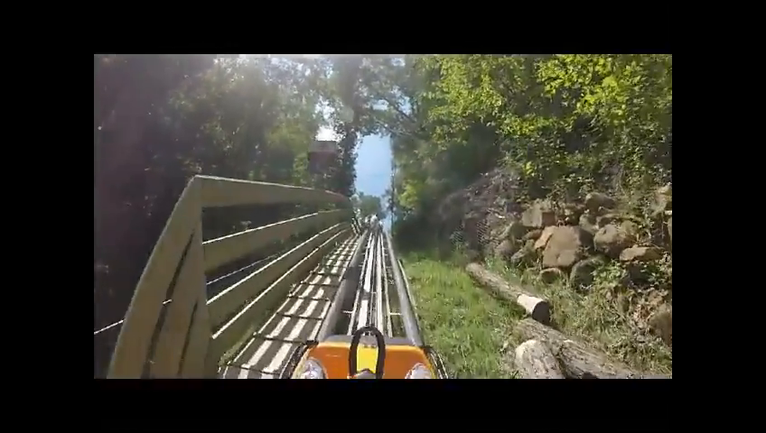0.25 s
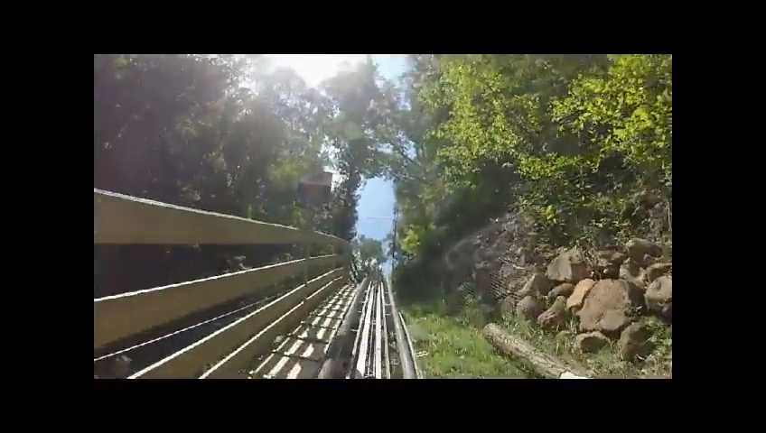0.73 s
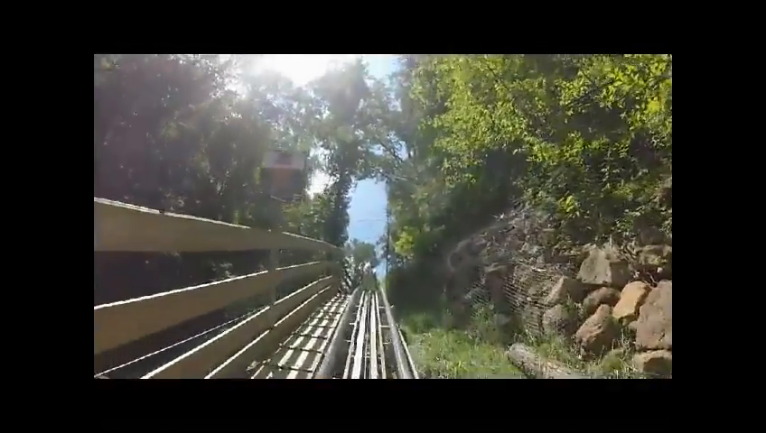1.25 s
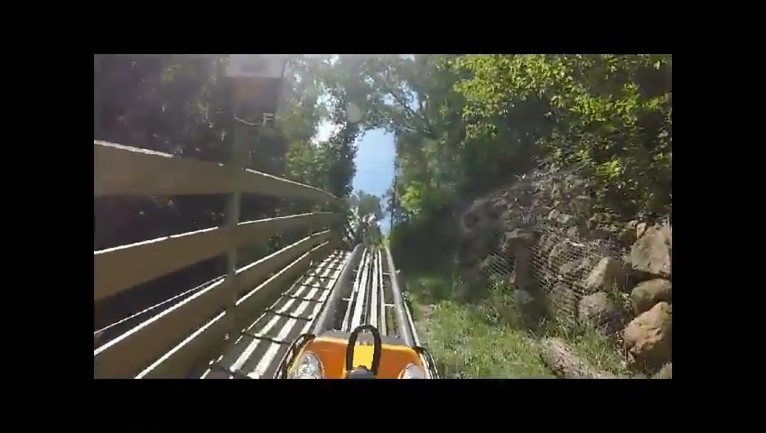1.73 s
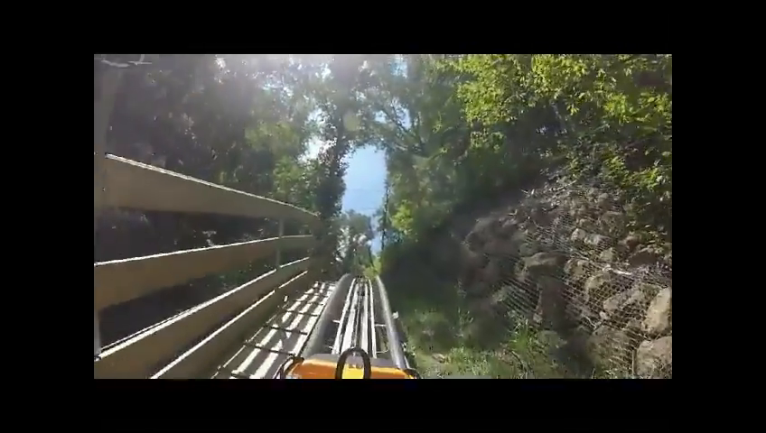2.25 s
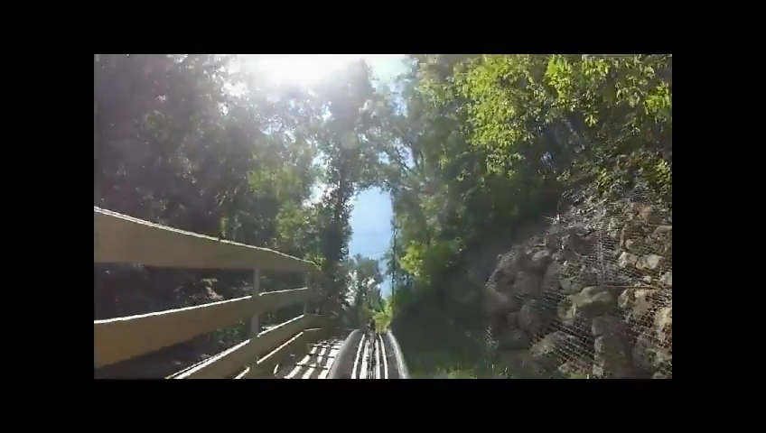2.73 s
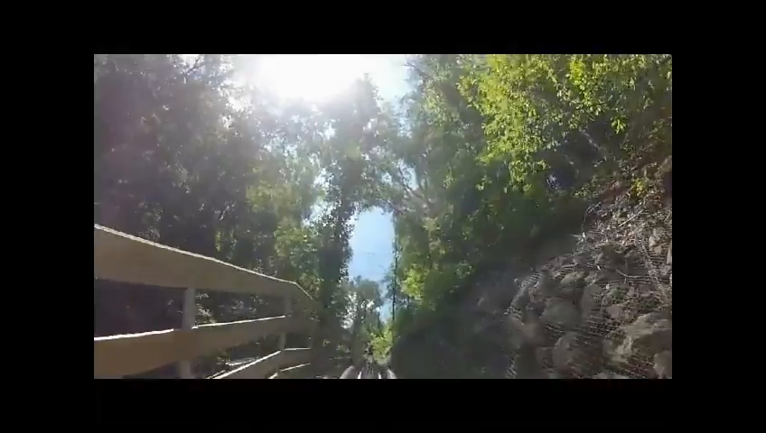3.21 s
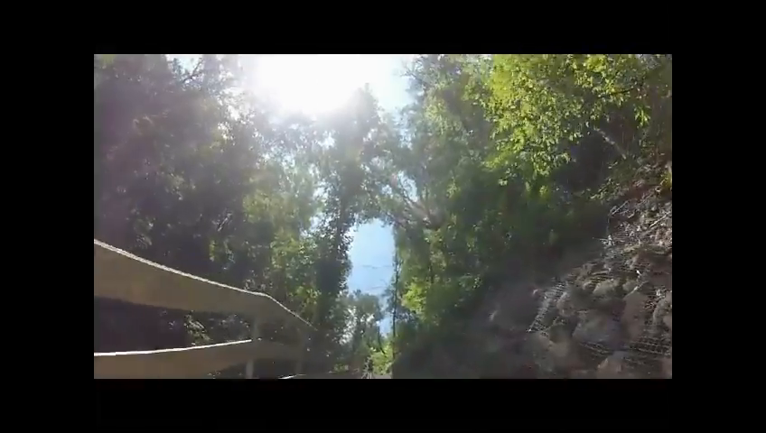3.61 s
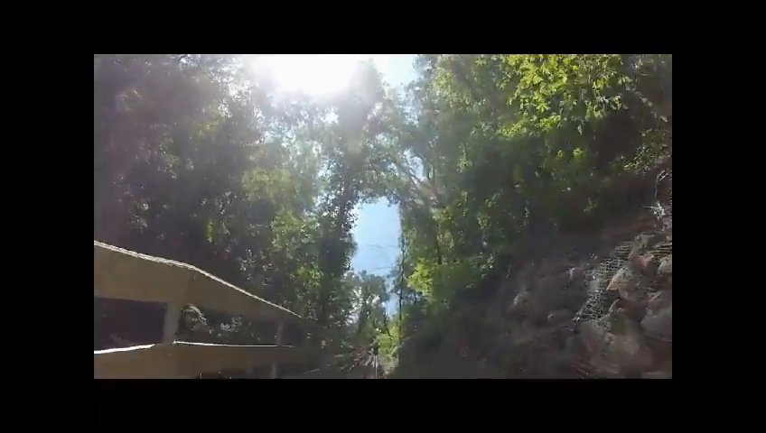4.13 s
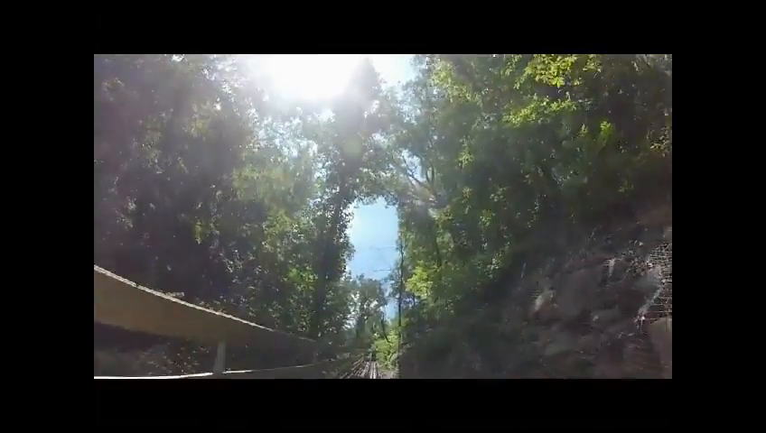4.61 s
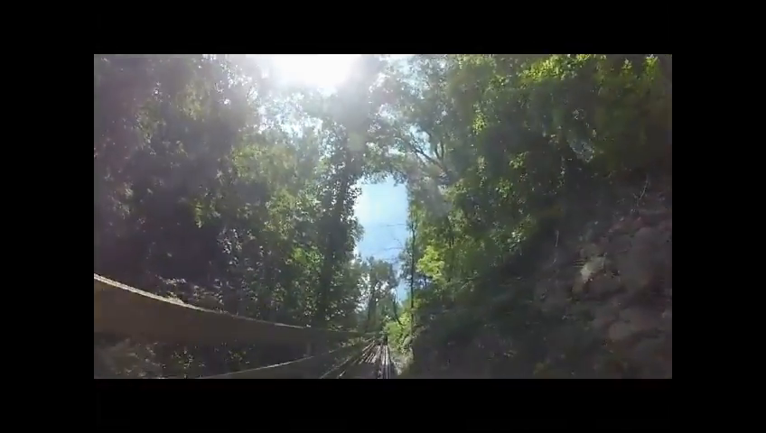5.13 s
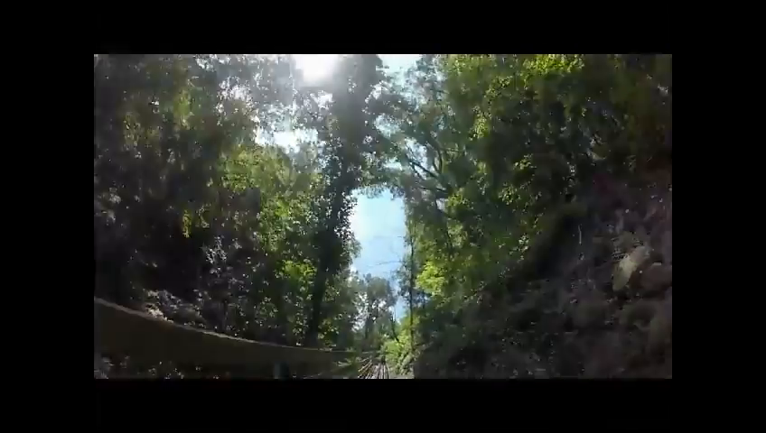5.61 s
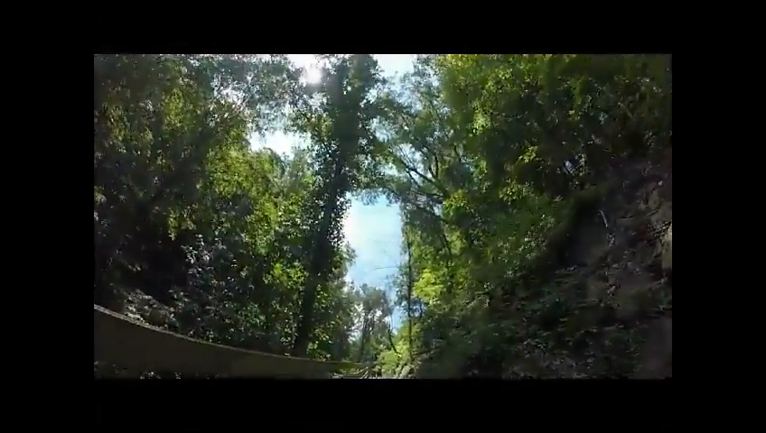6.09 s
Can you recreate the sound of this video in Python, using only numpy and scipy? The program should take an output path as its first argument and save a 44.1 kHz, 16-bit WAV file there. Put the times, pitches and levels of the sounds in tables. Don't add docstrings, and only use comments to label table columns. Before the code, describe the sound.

Close inside a plastic housing on a rail cart in the woods, a hand scrapes in stuttering strokes over a deep frame hum. Around 1.4 seconds a heavy double thump and bright plastic crack stand out. The scraping stops near 2 seconds, leaving dry metal pawl clicks in uneven runs, boxy rail knocks, soft wheel grit and faint hiss.

```python
import sys
import numpy as np
from scipy import signal
from scipy.fft import rfft, irfft
from scipy.io import wavfile
from scipy.ndimage import uniform_filter1d

SR = 44100
rng = np.random.default_rng(int(sys.argv[2]) if len(sys.argv) > 2 else 0)


def transcribe(u):
    v = np.clip(np.atleast_2d(u).T, -1, 1)
    q = np.round(v * 32767).astype(np.int16)
    wavfile.write(sys.argv[1], SR, q)


def gain_from_db(level_db):
    decades = np.asarray(level_db, float) / 20
    return 10 ** decades


N = 280476
T = np.arange(N) / SR

# time_s, pitch_hz, hum_db
FRAME_MODE = [(0.0, 30.4, -43), (0.3, 29.8, -43), (0.6, 26.63, -48), (1.05, 23.6, -39), (1.4, 30.47, -71),
              (1.8, 36.14, -41), (2.0, 29.22, -44.5), (2.4, 27.02, -39.5), (3.2, 27.4, -44.5),
              (3.5, 24.74, -42), (3.9, 29.97, -38.5), (4.45, 30.6, -36.5), (4.75, 29.45, -41),
              (5.0, 27.3, -36.5), (5.5, 26.06, -38.5), (5.9, 25.4, -39), (6.36, 25.5, -46)]
# start_s, hold_s, hum_db
SURGES = [
    (0.0, 0.036, -34),
    (1.14, 0.011, -35),
    (1.31, .01, -40),
    (1.424, 0.053, -27),
    (1.918, 0.0081, -30.5),
    (2.926, 0.01, -25.5),
    (3.171, 0.0072, -32.5),
    (5.314, .01, -32),
    (5.601, 0.012, -23.5),
]
# start_s, hold_s, jolt_db, buzz_db
BUMPS = [(0.0, 0.08, -37.5, -48.5), (0.298, 0.027, -40.5, -49), (0.47, .01, -35, -62),
         (0.752, 0.027, -37, -41), (0.88, 0.16, -39.5, -55), (1.057, 0.059, -45, -37),
         (1.31, .02, -34.5, -42.5), (1.414, 0.032, -35, -42), (1.517, 0.0064, -27.5, -31),
         (1.62, 0.021, -31, -43), (1.735, 0.027, -54, -40), (1.916, 0.0081, -35, -62),
         (2.473, .01, -37, -48), (2.946, 0.15, -41, -48), (3.602, 0.022, -38, -59),
         (3.696, 0.065, -35.5, -45.5), (3.86, 0.33, -45, -74), (4.173, 0.018, -59, -58),
         (5.194, 0.13, -49, -49), (5.57, 0.045, -47, -62), (5.72, 0.03, -34.5, -58),
         (5.868, 0.065, -50, -66), (6.242, 0.13, -62, -58)]
# freq_hz, density_db
JOLT_SPECTRUM = [(24, -42), (40, 10), (65, -2), (130, -17), (170, -18), (290, -120)]
# freq_hz, density_db
BUZZ_SPECTRUM = [(65, -44), (110, -0.5), (124, -3), (156, -6.5), (248, -15.5), (280, -14.5), (360, -50),
                 (620, -120)]
# time_s, peak_db, pitch_hz, t60_s
PUSHES = [(0.31, -41, 45.8, 0.1), (0.612, -34, 44.2, 0.26), (0.722, -27.5, 64, 0.13),
          (1.431, -13, 62, 0.037), (1.445, -21, 36, 0.1), (1.4645, -14, 42.6, 0.12),
          (1.51, -14, 85.9, 0.058), (1.534, -38, 45.5, 0.096), (1.914, -29, 45.9, 0.097),
          (2.44, -31, 45.9, 0.056), (2.921, -29, 45.4, 0.044), (3.719, -44, 58.1, 0.05),
          (5.593, -42, 45.8, 0.12)]
# time_s, peak_db, pitch_hz, t60_s
PULLS = [
    (1.4, -23.5, 26, 0.15),
    (1.424, -16, 70, 0.064),
]
# start_s, hold_s, wall_db, box_rel_db, fizz_rel_db
SCRAPE_STROKES = [(0.0, 0.012, -46, -5.5, -11), (0.03, 0.4, -54.5, -30, -10), (0.48, 0.027, -41.5, 2, -3),
                  (0.69, 0.24, -52, -11, -11), (0.8, 0.023, -44.5, 2, -12),
                  (0.87, 0.048, -46.5, -8.5, -7.5), (0.972, 0.19, -43, -17.5, -10),
                  (1.249, 0.034, -36.5, -22, -18.5), (1.31, 0.03, -38.5, -2.5, -10.5),
                  (1.433, 0.01, -40.5, -13, -7), (1.507, 0.05, -41.5, -9.5, -7.5),
                  (1.596, 0.014, -34.5, -30, -10), (1.655, 0.047, -49, -13, -5.5),
                  (1.721, 0.043, -41, -18, -11.5), (1.824, 0.037, -39, -14, -11),
                  (1.89, 0.0079, -34.5, -14.5, -7), (1.931, 0.01, -46, -8, -18)]
# time_s, ring_hz
GRIP = [
    (0.7, 2140),
    (0.79, 1780),
    (1.176, 2350),
    (1.246, 1890),
    (1.344, 1940),
    (1.424, 2563),
    (1.538, 1860),
    (1.66, 2280),
    (1.95, 2116),
]
# freq_hz, density_db
WALL_SPECTRUM = [(530, -18.5), (900, -12.5), (1290, -3), (1490, 5.5), (2220, -11), (2440, 1.5), (2850, 2),
                 (3190, -8), (3680, -21), (4010, -37), (4500, -43), (5850, -69), (9900, -120)]
# freq_hz, density_db
BOX_SPECTRUM = [(110, -60), (180, -41), (296, 2.5), (382, 4.5), (665, 1.5), (735, 5), (867, -10), (1010, 2),
                (1300, -9.5), (1690, -79), (2860, -120)]
# freq_hz, density_db
FIZZ_SPECTRUM = [(2060, -5), (3500, -3), (3700, 4), (3950, -9), (4580, -0.5), (5230, -12), (5910, -6.5),
                 (7100, -13.5), (9750, -18), (15000, -39)]
# ring_hz, width_hz, level_db
BRACKET_MODES = [(1677, 31, -14.5), (1864, 320, -9), (2300, 760, -1), (2560, 35, -14), (2950, 40, -39)]
# ring_hz, width_hz, level_db
BOX_MODES = [(262, 31, -3), (366, 116, -2), (471.4, 115, 2.5), (708, 19, -19), (1110, 51, -10.5)]
# freq_hz, density_db
HISS_SPECTRUM = [(35, -15), (60, -9.5), (139, -3), (226, -4), (271, -5.5), (316, -6), (577, -9.5),
                 (2240, -18.5), (2840, -24), (3300, -32.5), (4290, -42), (7260, -120)]
# freq_hz, density_db
AIR_SPECTRUM = [(1760, -50), (3000, 0.5), (3300, -4.5), (3550, -1), (3930, -2.5), (4260, 1), (4680, 0.5),
                (5540, -3), (6010, 4), (6300, 2.5), (8530, -11), (10700, -12.5), (12000, -18),
                (14100, -18.5), (15000, -28)]
# pitch_hz, level_db
WHINE = [(10070, -97), (12048, -101), (14026, -102), (14087, -101)]
# time_s, peak_db, fizz_db, box_db, chatter_s
HARD_KNOCKS = [(0.445, -33, -3, 3.5, 0.017), (0.478, -33.5, -2, -21, 0.085), (0.613, -40, -9, -14, 0.032),
               (1.512, -34.5, 5.5, -9, 0.063), (1.59, -30.5, -4, -7, 0.16), (2.135, -35.5, 1, -1.5, 0.021),
               (2.419, -35, -12, -1.5, 0.019), (3.5566, -45.5, 3, 6.5, 0.017),
               (3.914, -41.5, 6, -15, 0.035), (5.431, -34.5, 8.5, -13.5, 0.032),
               (5.7267, -31, -2, -2.5, 0.033), (5.752, -40, -4, -18, 0.024)]
# time_s, peak_db, ring_hz, box_db, chatter_s
DULL_KNOCKS = [(0.69, -42.5, 2170, -15, 0.1), (0.766, -32, 1750, -14, 0.027), (0.805, -30, 1800, -5, 0.056),
               (1.261, -26.5, 1400, -16, 0.048), (1.303, -39.5, 1490, 4.5, 0.061),
               (1.89, -29, 2030, -17, 0.022), (2.104, -32, 2643, -5, 0.085),
               (2.451, -33, 1630, -0.5, 0.023), (2.94, -31.5, 1810, -5, 0.065),
               (2.972, -36, 1900, 0, 0.034), (2.984, -43, 1880, -23, 0.015), (3.581, -39, 2696, 2, 0.038),
               (3.712, -40, 2380, 1.5, 0.056), (4.182, -49, 1600, 8, 0.011),
               (4.2075, -44.5, 1700, 4.5, 0.021), (5.757, -31, 1609, -5, 0.044),
               (5.779, -51, 1558, -17, 0.021)]
# time_s, peak_db, ring_hz, t60_s
SNAPS = [
    (1.3961, -23, 2350, 0.0064),
    (1.3997, -27.5, 2740, 0.0092),
    (1.4027, -36, 2250, 0.0098),
    (1.4242, -14, 3010, 0.012),
]
# time_s, level_db
TAIL_LEVEL = [(2.0, -56), (2.11, -46), (2.51, -43.5), (2.73, -50), (2.95, -51), (3.14, -43.5),
              (3.2, -42.5), (3.38, -43.5), (3.65, -71), (3.81, -47), (4.04, -51), (4.42, -53.5),
              (5.08, -54.5), (5.21, -48), (5.38, -42), (5.78, -54.5), (5.92, -44.5), (6.12, -49),
              (6.36, -74)]
# time_s, peak_db, ring_hz, side_db, upper_db
LOOSE = [(2.0183, -43, 2400, -5, -22), (2.7008, -47, 1880, -23, -16), (2.8739, -58, 2206, -11, -17),
         (2.8988, -45, 1457, -12, -16), (3.0989, -37.5, 2140, -19, -23),
         (3.1053, -37.5, 2260, -22, -25), (3.1652, -43, 1790, -16, -14),
         (3.1837, -36, 2230, -10, -17), (3.1946, -34.5, 2120, -12, -27),
         (3.2395, -43, 1862, -13, -19), (3.252, -39, 1910, -9, -14), (3.2714, -42, 2366, -10, -22),
         (3.2914, -43.5, 2440, -5, -4.5), (3.3223, -40, 2230, -10, -14),
         (3.3394, -41.5, 1680, -12, -3.5), (3.3644, -48, 1670, -15, -15),
         (3.4082, -47, 1965, -15, -20), (3.701, -32.5, 2300, -11, -32), (3.7688, -38, 2165, -11, -23),
         (3.7904, -40.5, 2254, -9, -22), (3.8372, -42.5, 2220, -10, -23),
         (3.8514, -38.5, 1700, -12, -11.5), (3.8694, -44, 2460, -15, -20),
         (3.909, -43, 2290, -15, -13), (3.9284, -39.5, 1660, -19, -17), (3.9544, -53, 2246, -14, -11),
         (3.9694, -44, 1680, -18, -20), (4.0074, -51, 2310, -7, -5), (4.3296, -44.5, 2414, -16, -10),
         (4.7292, -43, 2347, -20, -14),
         (5.1656, -39.5, 1576, -8, -24), (5.373, -39.5, 2232, -18, -20), (5.3909, -41, 2180, -11, -19),
              (5.454, -39, 2520, -12, -14), (5.4699, -36.5, 2330, -15, -19), (5.515, -46, 2190, -12, -9),
              (5.5261, -36.5, 2400, -16, -21), (5.5636, -49, 2430, -14, -13), (5.5901, -48, 1920, -16, -20),
              (5.6057, -47.5, 1800, -12, -14), (5.8573, -50, 2250, -14, -24),
              (5.8726, -38.5, 2230, -7, -24), (5.885, -40, 2160, -13, -23), (5.9415, -41.5, 2074, -4, -6),
              (5.9547, -36.5, 1790, -7.5, -9), (5.965, -41, 2270, -12, -14), (6.0286, -37, 1840, -9, -20),
              (6.0446, -42, 2180, -16, -17)]
# time_s, peak_db, ring_hz, upper_db, box_db
SEATED = [(2.558, -37, 2280, -30, 0.5), (2.603, -44, 2300, -7, 6.5), (2.6323, -39, 2130, -16, -5),
          (2.6498, -48, 1860, -13, 4), (2.7126, -40.5, 1890, -9.5, -13), (2.777, -49, 1770, -21, 8),
          (3.037, -32.5, 1810, -13.5, -2), (3.0606, -41.5, 2170, -24, 15.5), (5.2394, -28, 1650, -14.5, -2),
          (5.2482, -29, 1670, -20, -7), (5.2662, -33.5, 2370, -27, 7), (6.1089, -46, 1717, -26, -3)]
# time_s, peak_db, ring_hz
TINKS = [
    (2.6444, -51, 3980),
    (3.3697, -54, 3530),
    (3.9344, -51, 3550),
    (3.9541, -50, 3700),
    (5.2707, -56, 3960),
    (5.4552, -49, 3840),
    (5.5139, -47, 3664),
    (5.7319, -38.5, 3880),
]
# start_s, hold_s, level_db
SQUEAKS = [
    (4.086, 0.0954, -69),
    (4.299, .015, -70),
]


def evened(x):
    return x / np.sqrt(np.mean(x ** 2) + 1e-20)


def peaked(x):
    return x / abs(x).max()


def curves(rows):
    s, *columns = np.transpose(rows)
    return [np.interp(T, s, c) for c in columns]


def swells(start_s, hold_s, db, rise_db_per_s, fall_db_per_s):
    t = T[::32, None]
    early_s = np.maximum(start_s - t, 0)
    late_s = np.maximum(t - start_s - hold_s, 0)
    level_db = db - rise_db_per_s * early_s - fall_db_per_s * late_s
    return np.interp(T, t[:, 0], np.sqrt((gain_from_db(level_db) ** 2).sum(1)))


def wander(seconds):
    size = max(int(seconds * SR), 1)
    once = uniform_filter1d(rng.standard_normal(N), size)
    return evened(uniform_filter1d(once, size))


def tone(hz):
    return np.sqrt(2) * np.sin(2 * np.pi * np.cumsum(hz) / SR)


def grit(count, per_s, spread_db, smooth):
    size = gain_from_db(spread_db * np.minimum(rng.exponential(1, count), 5))
    hits = size * (rng.random(count) < per_s / SR)
    return evened(hits * rng.choice([-1., 1.], count)) + smooth * rng.standard_normal(count)


def colour(x, points):
    f, level_db = np.transpose(points)
    hz = np.fft.rfftfreq(N, 1 / SR)
    gain = gain_from_db(np.interp(np.log(hz + 1), np.log(f + 1), level_db))
    return evened(irfft(rfft(x) * gain, N))


def band(x, low_hz, high_hz):
    return signal.sosfilt(signal.butter(3, [low_hz, high_hz], "band", fs=SR, output="sos"), x)


def resonate(x, hz, width_hz):
    turn = np.exp(2j * np.pi * np.cumsum(hz * np.ones(len(x))) / SR)
    r = np.exp(-np.pi * width_hz / SR)
    return 2 * (turn * signal.lfilter([1 - r], [1, -r], x / turn)).real


def steep(x, hz, width_hz):
    r = np.exp(-np.pi * width_hz / SR)
    pole = r * np.exp(2j * np.pi * hz / SR)
    return 2 * signal.lfilter([(1 - r) ** 2], np.poly([pole, pole]), x).real


def rings(x, modes, spread_db=0):
    luck = gain_from_db(spread_db * rng.standard_normal(len(modes)))
    return sum(g * gain_from_db(db) * steep(x, hz, 1.25 * width_hz) * np.sqrt(100 / width_hz)
               for g, (hz, width_hz, db) in zip(luck, modes))


def add(mix, s, sound):
    part = mix[max(round(s * SR), 0):][:len(sound)]
    part += sound[:len(part)]


def stroke(ring_hz, length_s, ring_gain, tail, spread_db):
    t = np.arange(SR // 8) / SR
    shape = np.exp(-(t / length_s) ** 2) + tail * np.exp(-t / .03)
    bounces = grit(count=len(t), per_s=2200, spread_db=spread_db, smooth=1.0)
    drive = bounces * shape * np.minimum(t / 0.00031, 1)
    drive[30] = 9 * np.sign(drive[30])
    dull = band(drive, 1030, 3780)
    modes = rings(dull, BRACKET_MODES, spread_db=3)
    mate_hz = 1750 if ring_hz > 2000 else 2276
    pair = steep(dull, ring_hz, 260) + 0.36 * steep(dull, mate_hz, 245)
    return drive, peaked(ring_gain * pair + modes + 0.19 * dull)


def frame():
    hz, hum_db = curves(FRAME_MODE)
    surge = swells(*np.transpose(SURGES), rise_db_per_s=340, fall_db_per_s=250)
    load = np.hypot(gain_from_db(hum_db), surge)
    start_s, hold_s, jolt_db, buzz_db = np.transpose(BUMPS)
    calm_jolt_db, calm_buzz_db = -46.5, -59.5
    rise, fall = 220, 133
    jolt = np.hypot(gain_from_db(calm_jolt_db), swells(start_s, hold_s, jolt_db, rise, fall))
    buzz = np.hypot(gain_from_db(calm_buzz_db), swells(start_s, hold_s, buzz_db, rise, fall))

    out = tone(hz * (1 + .13 * wander(.03))) * load * gain_from_db(-1 + 3 * wander(.03))
    shake = rng.standard_normal(N)
    sway = evened(steep(shake, 15.1, 13.3))
    out += sway * (load * gain_from_db(-12) + jolt * gain_from_db(-5.5))
    mount = evened(steep(shake, 72.3, 32))
    out += (colour(shake, JOLT_SPECTRUM) + 0.26 * mount) * jolt * gain_from_db(-4.5 + 2.0 * wander(0.038))
    out += colour(rng.standard_normal(N), BUZZ_SPECTRUM) * buzz * gain_from_db(-5.5 + 3.3 * wander(0.033))

    t = np.arange(SR // 2) / SR
    onset = 1 - np.exp(-t / 0.0056)
    for way, blows in [(1, PUSHES), (-1, PULLS)]:
        for s, db, pitch_hz, t60_s in blows:
            decay = gain_from_db(db + 6.5 - 60 * t / t60_s)
            add(out, s, way * decay * np.sin(2 * np.pi * pitch_hz * t) * onset)
    return out


def scrape():
    start_s, hold_s, level_db, box_db, fizz_db = np.transpose(SCRAPE_STROKES)
    on_wall, on_box, on_fizz = (swells(start_s, hold_s, level_db + db, rise_db_per_s=430, fall_db_per_s=320)
                                for db in (0, box_db, fizz_db))
    slip, fine = (grit(count=N, per_s=3000, spread_db=3.5, smooth=1.0) * gain_from_db(1.43 * wander(0.0081))
                  for _ in range(2))
    grip_hz = curves(GRIP)[0] + 100 * wander(0.034)
    grip_ring = resonate(resonate(slip, grip_hz, 420), grip_hz, 420)
    modes = .45 * evened(rings(slip, BRACKET_MODES)) + .45 * evened(grip_ring)
    wall = evened(colour(slip, WALL_SPECTRUM) + modes)
    box = evened(colour(slip, BOX_SPECTRUM) + 0.38 * evened(rings(slip, BOX_MODES)))
    return on_wall * wall + on_box * box + on_fizz * colour(fine, FIZZ_SPECTRUM)


def hiss():
    hiss_db, air_db = -55, -62
    noise = rng.standard_normal(N)
    swell_db = .6 * wander(.06)
    out = gain_from_db(hiss_db + swell_db) * colour(noise, HISS_SPECTRUM)
    out += gain_from_db(air_db + swell_db) * colour(noise, AIR_SPECTRUM)
    return out + sum(np.sqrt(2) * gain_from_db(db) * np.sin(2 * np.pi * hz * T) for hz, db in WHINE)


def knocks():
    out = np.zeros(N)
    hard_ring_hz, dull_fizz_db = 2394, -9
    rows = [(s, db, hard_ring_hz, *rest) for s, db, *rest in HARD_KNOCKS]
    rows += [(s, db, ring_hz, dull_fizz_db, *rest) for s, db, ring_hz, *rest in DULL_KNOCKS]
    for s, db, ring_hz, fizz_db, box_db, chatter_s in rows:
        ring_gain = .9 * gain_from_db(-max(box_db + 6, 0))
        drive, ring = stroke(ring_hz, chatter_s, ring_gain, tail=.35, spread_db=4)
        box = rings(drive, BOX_MODES, spread_db=3) + .35 * band(drive, 300, 1300)
        t = np.arange(len(drive)) / SR
        puff = rng.standard_normal(len(t)) * np.exp(-t / chatter_s)
        fizz = band(puff, 3300, 7100) + 0.54 * band(puff, 7040, 10400) + 0.16 * band(puff, 9900, 13900)
        knock = ring + gain_from_db(box_db) * peaked(box) + gain_from_db(fizz_db - 11.5) * peaked(fizz)
        add(out, s, gain_from_db(db - 0.95) * knock)
    return out


def judder():
    start_s, length_s, top_hz, level_db = 1.12, 0.57, 83.5, -38
    arch = np.sin(np.pi * np.clip((T - start_s) / length_s, 0, 1))
    wobble = tone(top_hz * (.55 + 0.383 * arch) * (1 + 0.066 * wander(0.028)))
    return gain_from_db(level_db + 2.0 * wander(0.037)) * arch ** 0.22 * wobble


def snaps():
    out, t = np.zeros(N), np.arange(SR // 20) / SR
    partials = [(1.015, 0.95), (0.78, 0.73), (0.96, 0.37), (2.08, .12)]
    for s, db, ring_hz, t60_s in SNAPS:
        crack = band(rng.standard_normal(len(t)) * np.exp(-t / .001), 1000, 9500)
        tones = sum(g * np.sin(2 * np.pi * k * ring_hz * t) for k, g in partials)
        ring = 1.14 * tones * gain_from_db(-60 * t / t60_s) * (1 - np.exp(-t / 0.0003))
        add(out, s, gain_from_db(db - 4.5) * (ring + 0.41 * peaked(crack)))
    return out


def tails():
    level_db, = curves(TAIL_LEVEL)
    body = evened(rings(grit(count=N, per_s=1700, spread_db=-1.0, smooth=0.7), BRACKET_MODES))
    fade_in = np.clip((T - TAIL_LEVEL[0][0]) / 0.061, 0, 1)
    return gain_from_db(level_db - 12.5 + 2.0 * wander(0.01)) * body * fade_in


def pawls():
    out = np.zeros(N)
    loose_box_db, seated_side_db = -8.5, -20.5
    rows = [(*row, loose_box_db) for row in LOOSE]
    rows += [(s, db, ring_hz, seated_side_db, *rest) for s, db, ring_hz, *rest in SEATED]
    for s, db, ring_hz, side_db, upper_db, box_db in rows:
        drive, ring = stroke(ring_hz, length_s=.012, ring_gain=2.0, tail=.16, spread_db=2.5)
        upper_hz = 3520 if ring_hz > 2285 else 3905
        upper_hz += 20 * rng.standard_normal()
        upper = gain_from_db(upper_db + 2.5) * peaked(steep(band(drive, 3600, 8960), upper_hz, 180))
        side = gain_from_db(side_db + 2.0) * peaked(steep(drive, 2820, 200))
        box = rings(drive, BOX_MODES[1:3]) + 0.12 * band(drive, 360, 1054)
        add(out, s, gain_from_db(db - 2.0) * (ring + side + upper + gain_from_db(box_db - 6.0) * peaked(box)))
    return out


def tinks():
    out, t = np.zeros(N), np.arange(SR // 20) / SR
    for s, db, ring_hz in TINKS:
        rattle = rng.standard_normal(len(t)) * np.exp(-t / 0.0064)
        add(out, s, gain_from_db(db - 1.0) * peaked(steep(rattle, ring_hz, 200)))
    return out


def squeaks():
    gain = swells(*np.transpose(SQUEAKS), rise_db_per_s=250, fall_db_per_s=770)
    return tone(4280 + 25 * wander(0.0337)) * gain


def scene():
    handled = frame() + scrape() + judder() + snaps()
    rails = hiss() + knocks() + tails() + pawls() + tinks() + squeaks()
    return (handled + rails)[None]


def low_pass(x):
    return signal.sosfilt(signal.butter(12, 15180, fs=SR, output="sos"), x)


def record(dry):
    return low_pass(dry)


dry = scene()
out = record(dry)
transcribe(out)
```